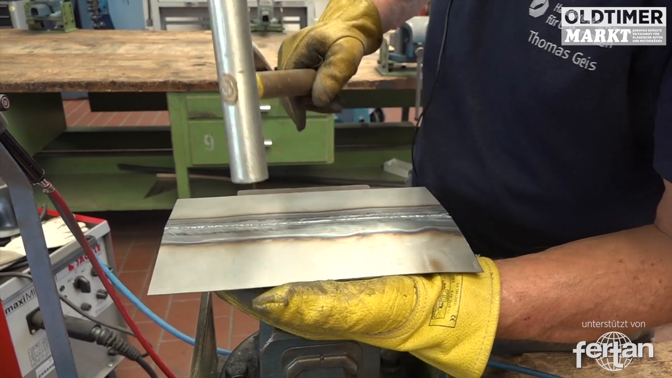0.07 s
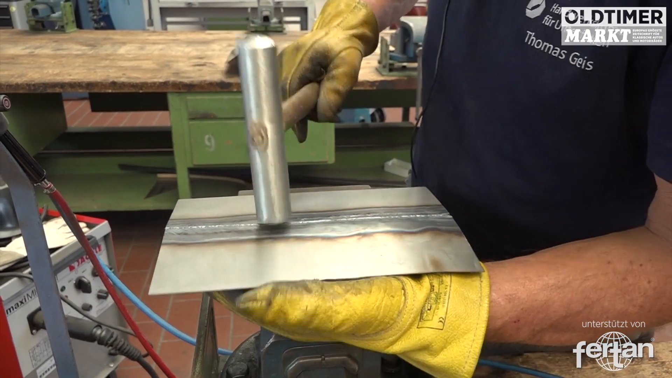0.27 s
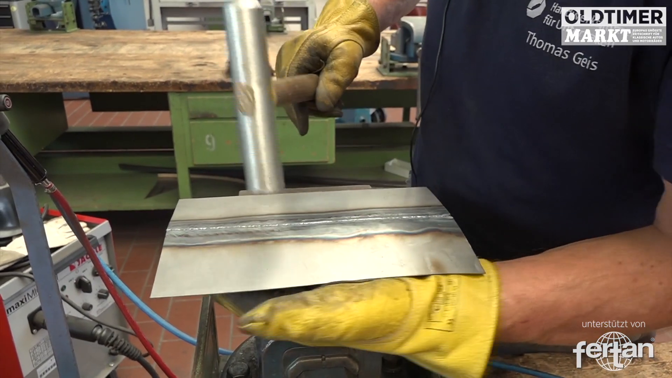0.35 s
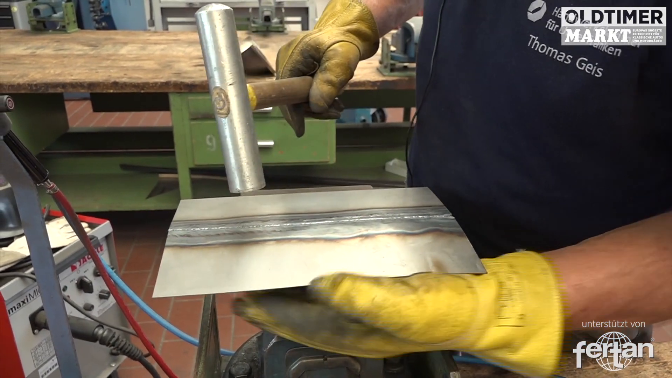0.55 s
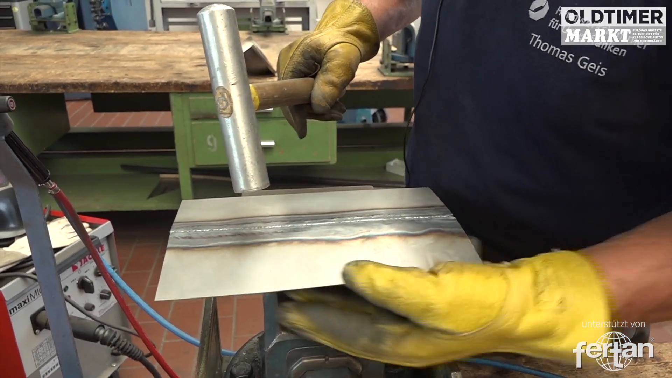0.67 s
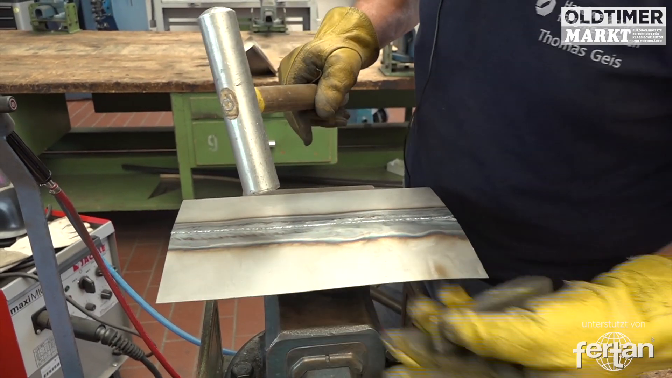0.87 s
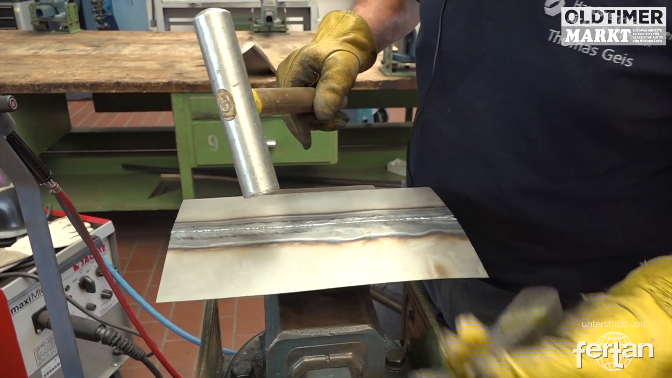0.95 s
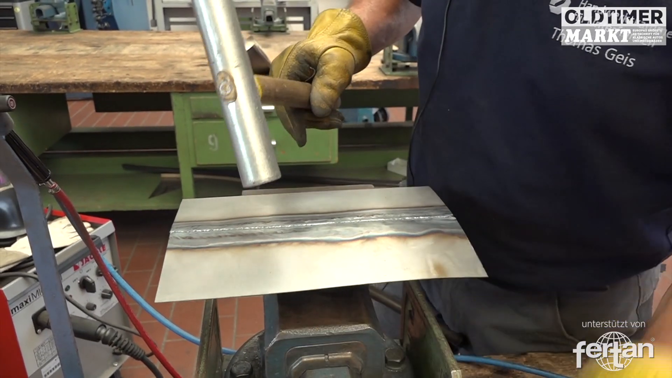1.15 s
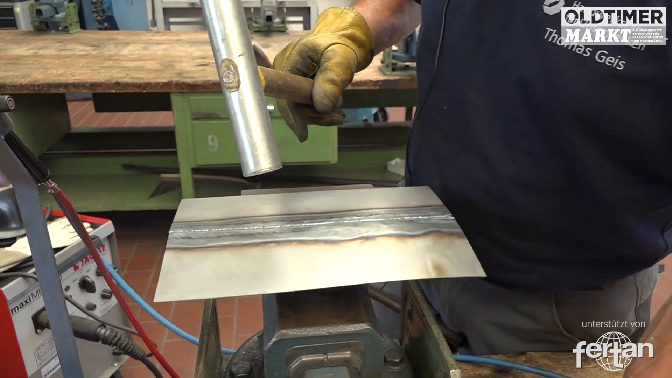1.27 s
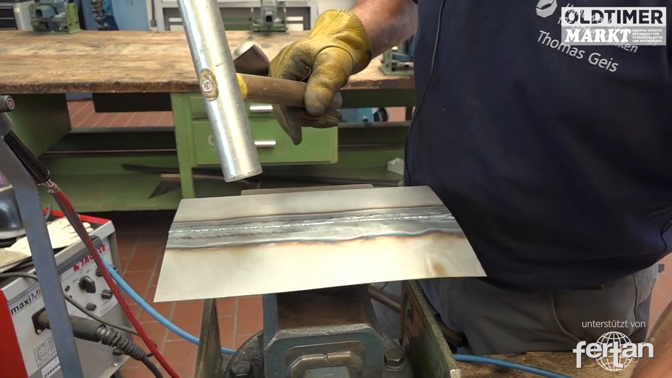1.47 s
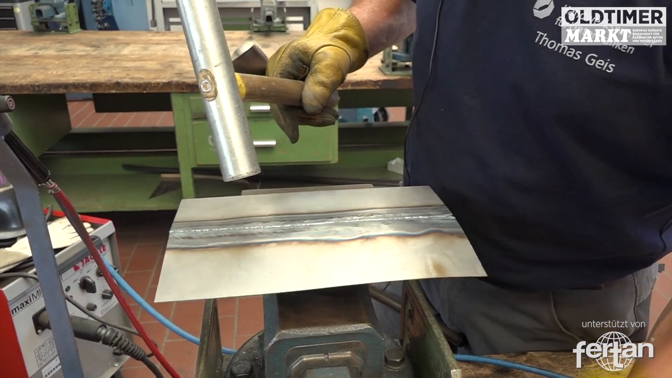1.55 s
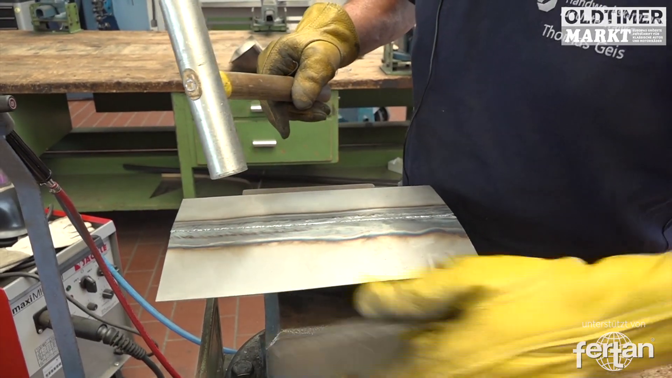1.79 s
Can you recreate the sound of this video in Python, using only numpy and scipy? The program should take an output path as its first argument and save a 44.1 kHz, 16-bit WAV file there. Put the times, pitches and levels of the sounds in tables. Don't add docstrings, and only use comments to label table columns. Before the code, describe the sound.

A hammer knock on sheet steel hits hard at 0.25 seconds, rattling until 0.28 with a bell-like note, damped near 0.4. A weaker knock at 0.46 joins gritty dragging and squeaks that rise to a bright scrape around 0.8, leaving thin ringing. At 1.29 a hollow, woody thud bounces and rocks; steel clinks at 1.49 and 1.55 ring away. Boomy workshop, close microphone, faint low room noise.

```python
import sys
import numpy as np
from scipy import signal
from scipy.fft import rfft, irfft
from scipy.io import wavfile
from scipy.ndimage import uniform_filter1d

SR = 44100
rng = np.random.default_rng(int(sys.argv[2]) if len(sys.argv) > 2 else 0)


def master_out(mix):
    frames = np.transpose(np.atleast_2d(mix))
    ceiling = np.clip(frames, -1, 1)
    pcm = np.round(ceiling * 32767).astype(np.int16)
    wavfile.write(sys.argv[1], SR, pcm)


def elevation(decibels):
    levels = np.asarray(decibels, float)
    return 10 ** (levels / 20)


N = 81585
TIME = np.arange(N) / SR
SCATTER_DB = 2.5

# f/Hz, level/dB
DULL_COLOUR = [(59, -39), (100, -12), (144, -7), (161, -25), (348, 2), (751, -8), (870, 1.5), (8000, -33.5),
               (10400, -50), (17600, -120)]
# t/s, peak level/dB, brightness/dB per octave
CLINK_BLOWS = [
    (1.4875, -7.5, 1),
    (1.5517, -10.5, -3.5),
    (1.5615, -27, 0),
    (1.577, -39, -8),
    (1.598, -35, 4.5),
]


def unit(x):
    return x / np.sqrt(np.mean(x ** 2))


def walk(rate):
    hold = int(SR / rate)
    steps = np.repeat(rng.standard_normal(N // hold + 1), hold)
    return unit(uniform_filter1d(steps, hold)[:N])


def noise(colour, peaks_db=0., peak_hz=60.):
    hz, db = np.array(colour).T
    bins = np.arange(N // 2 + 1)
    crowd = peaks_db * walk(N / peak_hz)[:N // 2 + 1]
    gain = elevation(np.interp(np.log(bins * SR / N + 1), np.log(hz), db) + crowd)
    return unit(irfft(rfft(rng.standard_normal(N)) * gain, N))


def fade(t, t60):
    return (t >= 0) * np.exp(-np.log(1000) * np.maximum(t, 0) / t60)


def ramp(start, length):
    return np.clip((TIME - start) / length, 0, 1)


def swelling_note(at, hz, db, t60, rise_s):
    t = np.maximum(TIME - at, 0)
    swell = 1 - np.exp(-t / rise_s)
    return elevation(db) * fade(TIME - at, t60) * swell * np.sin(2 * np.pi * hz * t)


def blows(events, modes, clatter, ring_db, clatter_db, clatter_t60, scatter_db,
          contact_s, punch_hz, punch_db, punch_s, damp_db):
    hz, db, t60 = np.array(modes).T[:, :, None]
    chance = rng.standard_normal((len(events), len(modes)))
    rattle = noise(clatter, peaks_db=3.5, peak_hz=120.0)
    out = np.zeros(N)
    for (at, peak_db, tilt_db), c in zip(events, chance):
        i = int(at * SR)
        out[i:] *= elevation(damp_db * (1 - fade(TIME[i:] - at, .03)))
        span = slice(i, i + SR // 2)
        t = np.maximum(TIME[span] - at, 0)
        octaves = np.log2(np.maximum(hz / punch_hz, 1))
        strength = elevation(db + ring_db + tilt_db * octaves + scatter_db * c[:, None])
        ring = -(strength * fade(t, t60) * np.sin(2 * np.pi * hz * t)).sum(axis=0)
        pulse = t / punch_s * np.exp(1 - t / punch_s)
        punch = -elevation(punch_db) * pulse * np.sin(2 * np.pi * punch_hz * t)
        puff = elevation(clatter_db + tilt_db) * fade(t, clatter_t60) * rattle[span]
        onset = (1 - np.exp(-t / contact_s)) ** 2
        out[span] += elevation(peak_db) * ((ring + puff) * onset + punch)
    return out


def room_floor():
    # f/Hz, level/dB
    colour = [(25, 16), (100, -0.5), (350, -4), (900, -10), (2000, -10.5), (4000, -20), (7000, -25),
              (13000, -18.5), (16000, -24)]
    return elevation(-50 + 0.47 * walk(5.6)) * noise(colour, peaks_db=3.0, peak_hz=196.5)


def earlier_tail():
    return elevation(-40) * fade(TIME, 0.92) * noise(DULL_COLOUR)


def hum():
    return elevation(-65 + 1.5 * walk(11.0)) * np.sin(2 * np.pi * 141 * TIME)


def glove_rustle():
    end_s, rise_s = 1.292, 0.07
    return elevation(-48) * (TIME < end_s) * np.exp((TIME - end_s) / rise_s) * noise(DULL_COLOUR)


def room(x):
    t60_low_s, t60_high_s, delay_s = 1.0, .6, .006
    t = TIME[:SR]
    lowpass = signal.butter(2, 900, fs=SR, output="sos")
    bandpass = signal.butter(1, [900, 5000], "bandpass", fs=SR, output="sos")
    low = signal.sosfilt(lowpass, rng.standard_normal(SR))
    high = signal.sosfilt(bandpass, rng.standard_normal(SR))
    echo = 2.0 * low * fade(t - delay_s, t60_low_s) + high * fade(t - delay_s, t60_high_s)
    echo = echo / np.sqrt(np.sum(high ** 2 * fade(t, t60_high_s) ** 2))
    return elevation(-24.5) * signal.fftconvolve(x, echo)[:N]


def sheet_ring():
    # f/Hz, level/dB, t60/s
    modes = [(574, -39.5, 1.5), (910, -39.5, 2.16), (1340, -46, 1.3), (1570, -40, 0.88), (2250, -51, 1.4)]
    first_s, second_s = CLINK_BLOWS[0][0], CLINK_BLOWS[1][0]
    sheet = sum(swelling_note(first_s, *mode, .02) for mode in modes)
    clear = swelling_note(first_s, 2111, -18, .5, 0.00037)
    return sheet + clear * elevation(-5 * ramp(second_s, .01))


def ticks():
    # t/s, level/dB
    edges = [
        (0.2453, -15.5),
        (0.254, -25),
        (0.2694, -30),
        (0.4618, -56),
        (1.293, -35),
        (1.4872, -37),
    ]
    hiss = noise([(1500, -13), (3500, 13), (9000, -4), (16000, -8.5)])
    return hiss * sum(elevation(db) * fade(TIME - at, 0.0082) for at, db in edges)


def rocks():
    # t/s, f/Hz, level/dB, t60/s
    touches = [(1.298, 505, -14, 0.12), (1.300, 401, -8, .12), (1.321, 308, -16, 0.075),
               (1.330, 355, -11.5, 0.096), (1.346, 454, -13, .1), (1.358, 456, -20.5, 0.073),
               (1.398, 693, -28.5, 0.11), (1.409, 394, -27, 0.09), (1.410, 283, -22.5, .12),
               (1.428, 299, -24, .12), (1.452, 447, -29, .08), (1.456, 299, -22, 0.14)]
    return sum(swelling_note(*touch, 0.0018) for touch in touches)


def clinks():
    # f/Hz, level/dB, t60/s
    modes = [(554, -5, .2), (800, -3, .12), (910, -1, .11), (1002, -3, .12), (1340, -14, .2),
             (1588, -13, .2), (1997, -6, .2), (2111, -12, .1), (2536, -10, .1), (2751, -13, .14),
             (3289, -21, .15), (3628, -20, .12), (4960, -28, .1), (6457, -29, .25)]
    # f/Hz, level/dB
    clatter = [(180, -3), (300, 3.5), (961, 1), (1460, -9.5), (2140, 1.5), (2280, -28), (2570, -8),
               (3890, -20), (16000, -63)]
    return blows(CLINK_BLOWS, modes, clatter, ring_db=-12.5, clatter_db=-16.5, clatter_t60=0.39,
                 scatter_db=SCATTER_DB, contact_s=0.0001, punch_hz=878, punch_db=-4.5, punch_s=0.0017,
                 damp_db=-2)


def thuds():
    # t/s, peak level/dB, brightness/dB per octave
    events = [
        (1.2921, -1.5, 2.5),
        (1.3165, -10.5, -7.5),
        (1.351, -32, -10),
        (1.360, -34.5, -13),
        (1.411, -25.5, 6),
        (1.455, -34, 7),
        (1.476, -21.5, -15),
    ]
    # f/Hz, level/dB, t60/s
    modes = [(83.7, -20.5, 0.69), (173.4, -4.5, 0.33), (287.4, -3, 0.35), (332.8, 5, 0.09),
             (397, 1.5, 0.11), (433, 3, 0.12), (505, 3, 0.11), (531.5, -14, 0.33), (750, 2.5, 0.025),
             (2770, -32, 0.35), (3640, -41, 0.32)]
    # f/Hz, level/dB
    clatter = [(30, -30), (70, -12), (200, -9.5), (330, -1.5), (500, -9.5), (1050, -14.5), (2200, -23),
               (16000, -77.5)]
    return blows(events, modes, clatter, ring_db=-14.5, clatter_db=-21.5, clatter_t60=0.45,
                 scatter_db=-0.5, contact_s=0.0006, punch_hz=391, punch_db=0.5, punch_s=0.0012,
                 damp_db=-0.6)


def squeaks():
    # t/s, length/s, first slip rate/Hz, last slip rate/Hz, level/dB
    bursts = [(.403, .095, 275, 268, -29), (.405, .10, 137, 142, -36), (.522, .05, 455, 485, -33),
              (.545, .04, 136, 132, -37), (.562, .058, 485, 522, -27), (.63, .035, 305, 300, -44),
              (.682, .075, 765, 662, -25), (.732, .052, 660, 690, -26), (.715, .06, 390, 350, -37),
              (.77, .075, 1015, 1000, -28), (.408, .04, 390, 415, -39), (.52, .04, 1130, 1165, -43),
              (.528, .025, 860, 850, -40), (.582, .06, 815, 845, -39), (.592, .03, 1185, 1170, -42),
              (.575, .02, 1400, 1390, -43), (.615, .032, 510, 505, -38), (.685, .035, 1255, 1290, -39),
              (.70, .055, 1030, 1040, -36), (.708, .06, 1100, 1095, -36), (.71, .025, 800, 820, -36),
              (.69, .065, 630, 595, -36), (.69, .045, 460, 478, -38), (.745, .035, 955, 970, -35),
              (.768, .045, 595, 582, -37), (.768, .025, 825, 815, -35), (.77, .035, 930, 880, -35),
              (.768, .085, 1305, 1310, -34), (.788, .04, 1490, 1495, -33), (.775, .045, 1720, 1690, -37),
              (.775, .05, 1800, 1750, -39), (.765, .085, 1445, 1415, -31), (.77, .035, 2250, 2200, -41),
              (.79, .038, 470, 445, -35), (.80, .055, 1115, 1125, -34)]
    partials_db = [-20, 0, -19, -24, -30]
    out = np.zeros(N)
    wobble, flutter = .008 * walk(100), elevation(2.2 * walk(80))
    for at, length, first_hz, last_hz, db in bursts:
        u = ramp(at, length)
        shift = int(first_hz * 20)
        hz = last_hz + (first_hz - last_hz) * (1 - u) ** 2
        phase = 2 * np.pi * np.cumsum(hz * (1 + np.roll(wobble, shift))) / SR
        swell = np.sqrt(np.sin(np.pi * u) + 1e-12) * (u > 0) * (u < 1)
        tone = sum(elevation(d) * np.sin((k + 1) * phase) for k, d in enumerate(partials_db))
        out += elevation(db) * np.roll(flutter, shift) * swell * tone
    return out


def drag():
    # t/s, level/dB, speed/0-1
    path = [
        (0.378, -41, 0.4),
        (.47, -42, .1),
        (.51, -44.5, 0.19),
        (.60, -33.5, 0.25),
        (0.674, -36.5, 0.17),
        (.714, -30, 0.33),
        (0.759, -28, 0.32),
        (0.791, -27, 0.8),
        (0.859, -35.5, 0.95),
    ]
    # f/Hz, level/dB
    slow_colour = [(150, -38.5), (400, -17.5), (700, -22), (1100, -7.5), (1700, -10.5), (2500, -10.5),
                   (4500, -29), (12000, -66)]
    fast_colour = [(150, -43), (470, -14.5), (1450, -6), (2100, 2), (3300, -4.5), (5500, -18.5),
                   (11000, -24), (15500, -34)]
    # f/Hz, level/dB, t60/s
    modes = [(545, -19, 3.0), (786, -21, 3.0), (1340, -13, .74), (1577, -1, .95), (1601, -12, .6),
             (1954, -8, .48), (2089, -12, .6), (2238, 0, 1.15), (2288, -2, 1.1), (2611, -3, .48),
             (2837, -4, .28), (2902, -1, .5), (3160, -20, .7), (3321, -6, .59)]
    at, db, speed = np.array(path).T
    release = np.minimum(1, np.exp((at[-1] - TIME) / 0.042))
    level = elevation(np.interp(TIME, at, db)) * ramp(at[0], 0.047) * release
    fast = np.clip(np.interp(TIME, at, speed), 0, 1)
    grit = elevation(1.75 * walk(250))
    slow_hiss = (1 - fast) * noise(slow_colour, peaks_db=4.5, peak_hz=69.9)
    fast_hiss = fast * noise(fast_colour, peaks_db=5.0, peak_hz=70.4)
    hiss = level * grit * (slow_hiss + fast_hiss)

    push = unit(level * fast ** 3 * grit * rng.standard_normal(N))
    free_s = .95
    ring = 0
    for hz, mode_db, t60 in modes:
        pole = np.exp(2j * np.pi * hz / SR - np.log(1000) / (t60 * SR))
        mode = signal.lfilter([1], [1, -pole], push)
        scale = fade(free_s - at[-1], t60) / np.abs(mode[int(free_s * SR)])
        ring = ring + elevation(mode_db) * mode.imag * scale
    return hiss, elevation(-38) * ring


def knocks():
    # t/s, peak level/dB, brightness/dB per octave
    events = [
        (.2185, -32, -7),
        (.2452, -1.5, 3),
        (.2535, -7.5, -15),
        (.261, -20, -5),
        (.2693, -7, -2),
        (.2715, -5.5, 0.5),
        (.2825, -8.5, -15),
        (.4612, -20, -1.5),
    ]
    # f/Hz, level/dB, t60/s
    modes = [(300, -3, .1), (420, -7, .15), (635, -5, .06), (805, 2, .16), (920, -3, .16), (1132, -7, .06),
             (1240, -8, .1), (140, -14, .2), (1906, -6, .06), (2080, -6, .07), (2606, -24, .1),
             (2885, -5, .19), (3192, -22, .15), (4678, -20, .18)]
    # f/Hz, level/dB
    clatter = [(60, -31), (330, 0), (800, 2), (2000, 2), (3000, -10), (4200, -15.5), (6000, -26.5),
               (15000, -36)]
    rattling = blows(events[:-1], modes, clatter, ring_db=-18.0, clatter_db=-13.5, clatter_t60=0.13,
                     scatter_db=SCATTER_DB, contact_s=0.00028, punch_hz=821, punch_db=0, punch_s=0.0006,
                     damp_db=-1.0)
    bell_s = .258
    bell = elevation(-17) * fade(TIME - bell_s, .55) * ramp(bell_s, 0.0036) * np.sin(2 * np.pi * 1577 * TIME)
    grip = elevation(-9 * ramp(.408, 0.012))
    last = blows(events[-1:], modes, clatter, ring_db=-18.0, clatter_db=-8.0, clatter_t60=0.061,
                 scatter_db=SCATTER_DB, contact_s=0.00062, punch_hz=810, punch_db=-2.5, punch_s=0.00061,
                 damp_db=0)
    return (rattling + bell) * grip + last


def scene():
    hiss, drag_ring = drag()
    near = knocks() + ticks() + squeaks() + hiss + thuds() + clinks() + rocks()
    ring = drag_ring + sheet_ring()
    background = room_floor() + earlier_tail() + hum() + glove_rustle()
    return (near + room(near) + ring + background)[None]


def band_limit(x):
    return signal.sosfilt(signal.butter(12, 16370, fs=SR, output="sos"), x)


def record(dry):
    rumble_cut = signal.butter(1, 30, "highpass", fs=SR, output="sos")
    top_cut = signal.ellip(8, .1, 60, 15500, fs=SR, output="sos")
    clipped = np.clip(signal.sosfilt(rumble_cut, dry), -.99, .99)
    mix = signal.sosfilt(top_cut, clipped)
    return band_limit(mix)


dry = scene()
out = record(dry)
master_out(out)
```